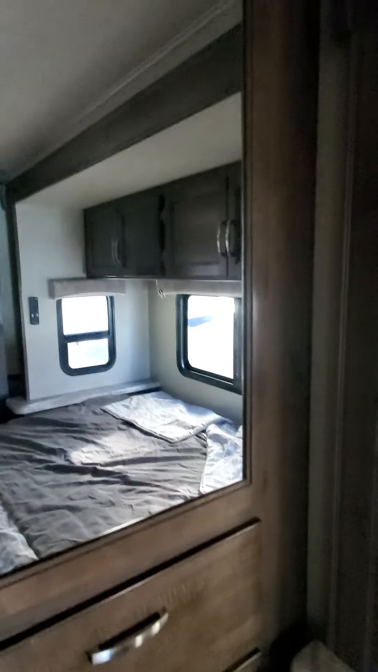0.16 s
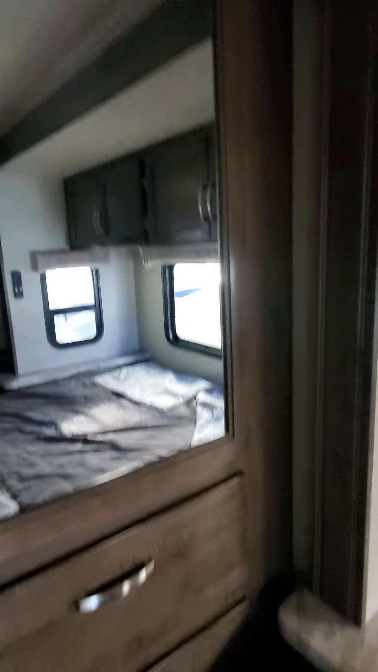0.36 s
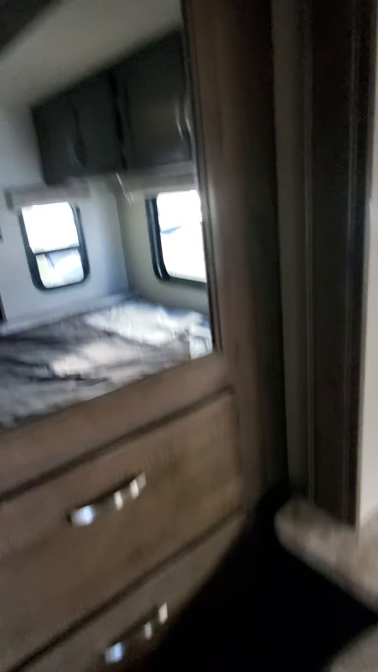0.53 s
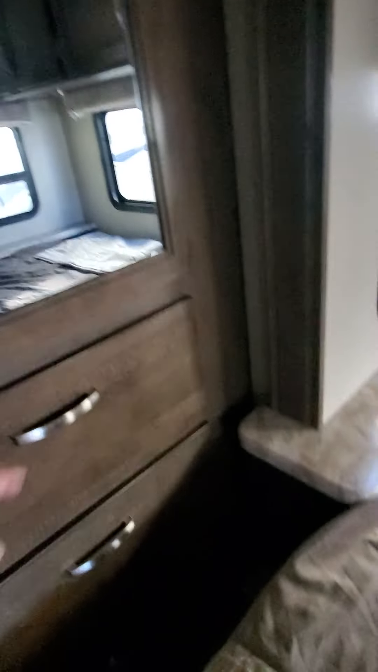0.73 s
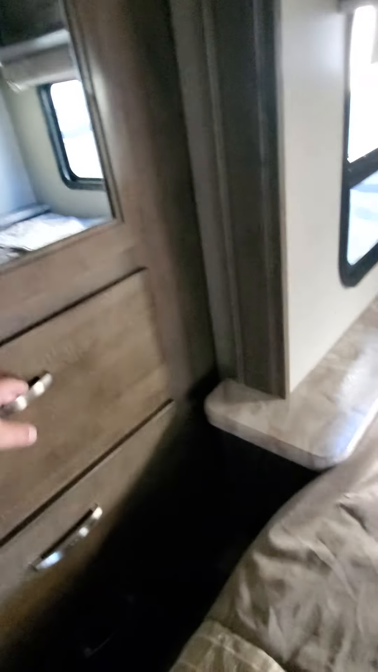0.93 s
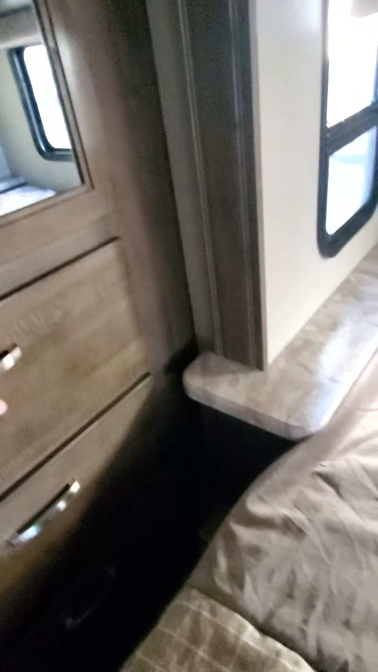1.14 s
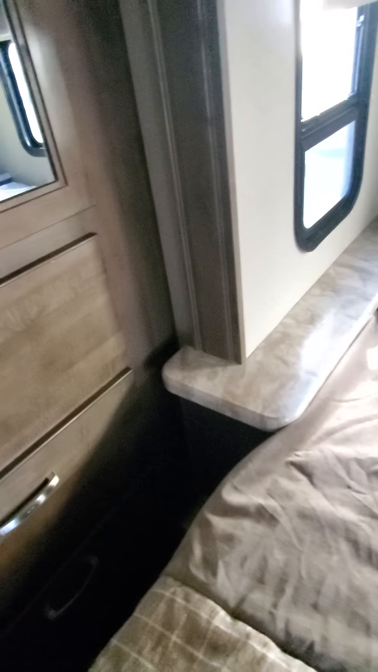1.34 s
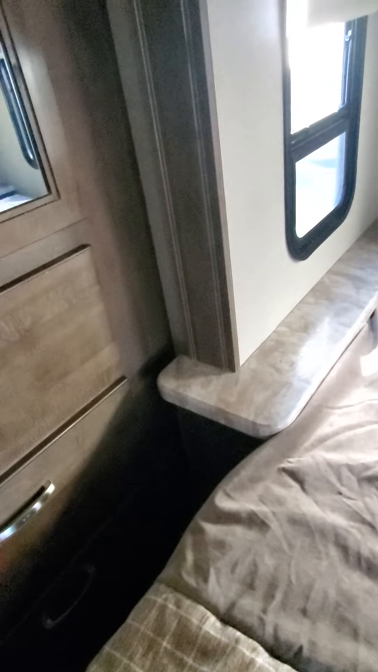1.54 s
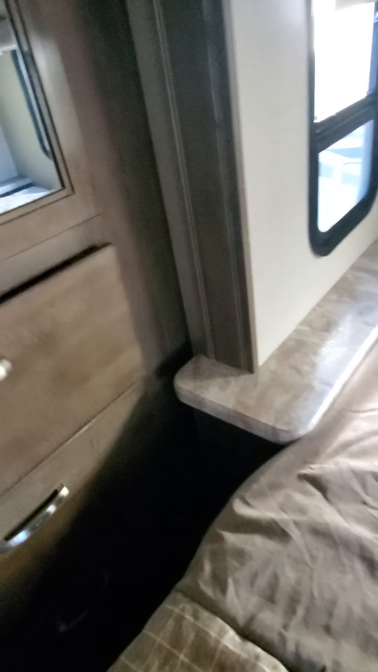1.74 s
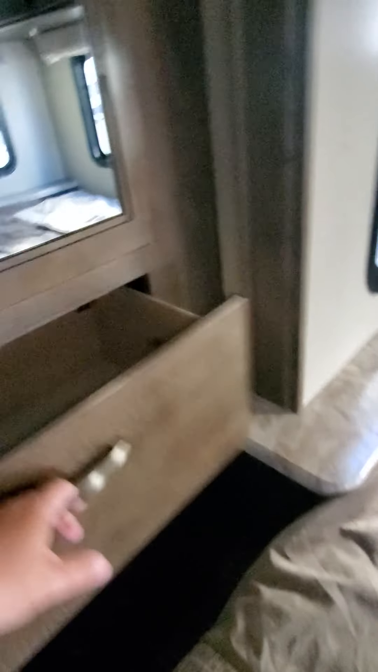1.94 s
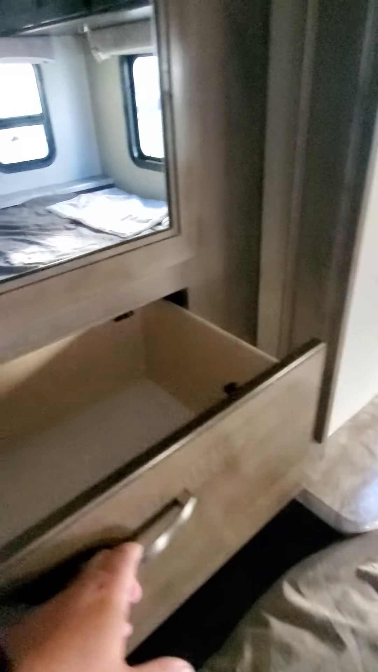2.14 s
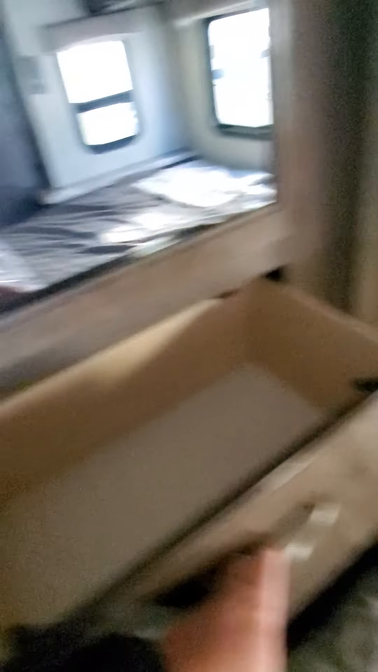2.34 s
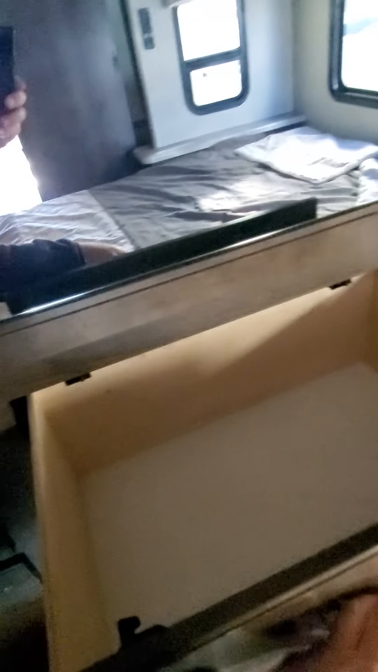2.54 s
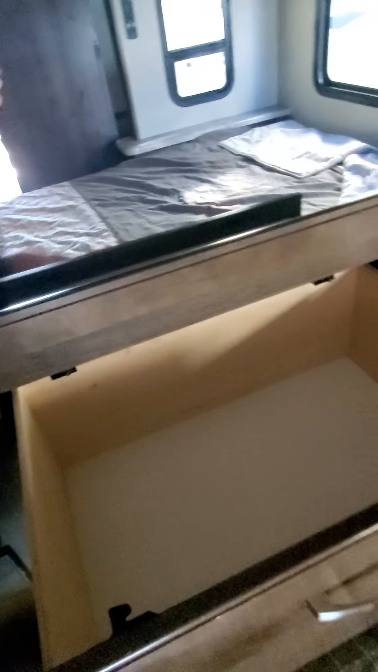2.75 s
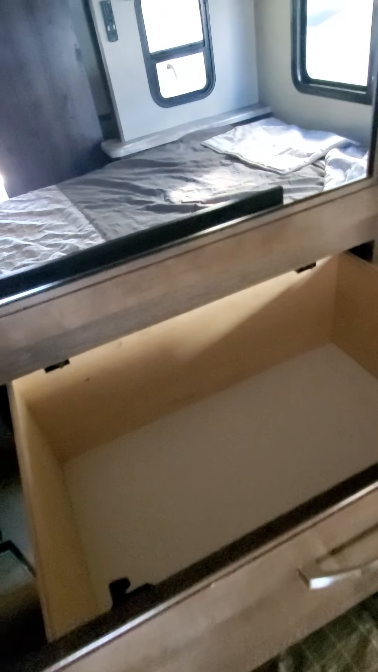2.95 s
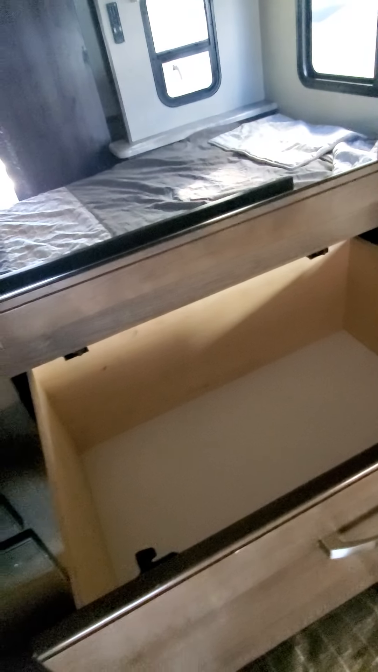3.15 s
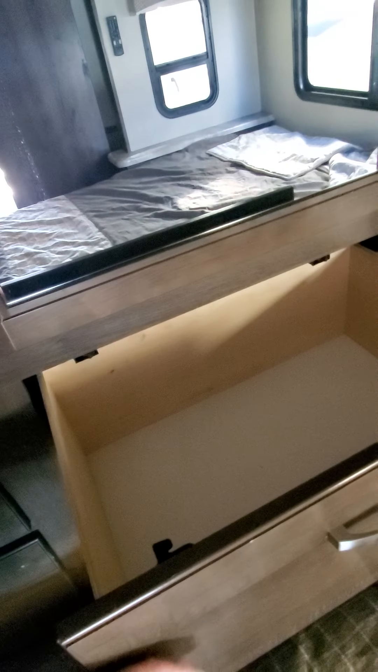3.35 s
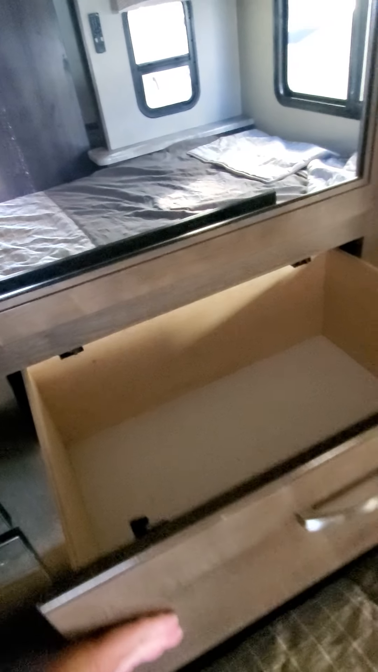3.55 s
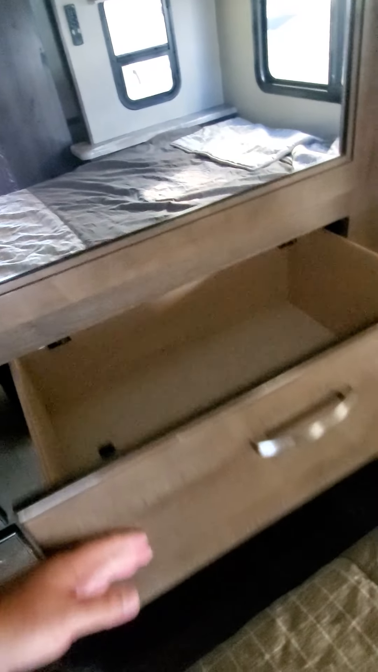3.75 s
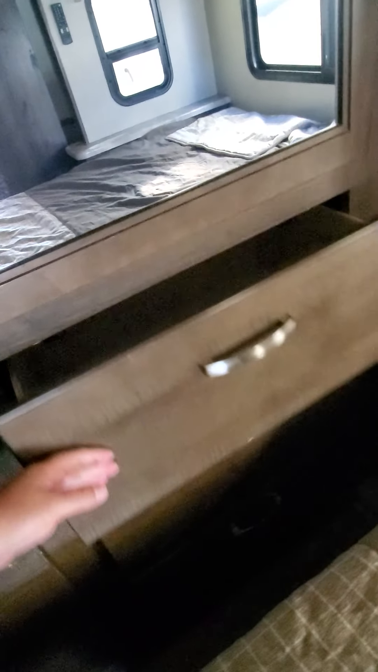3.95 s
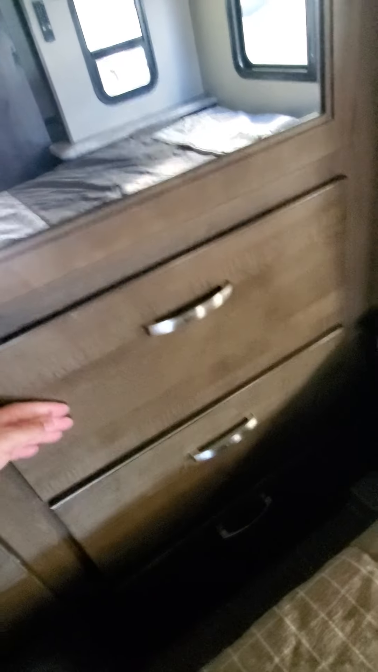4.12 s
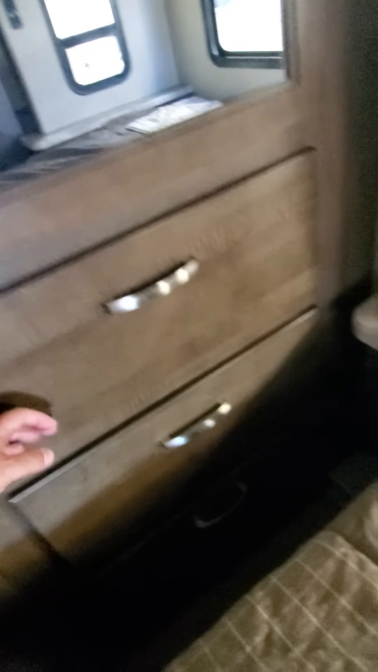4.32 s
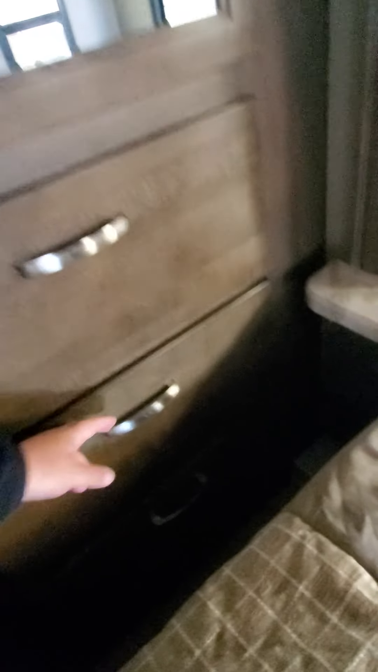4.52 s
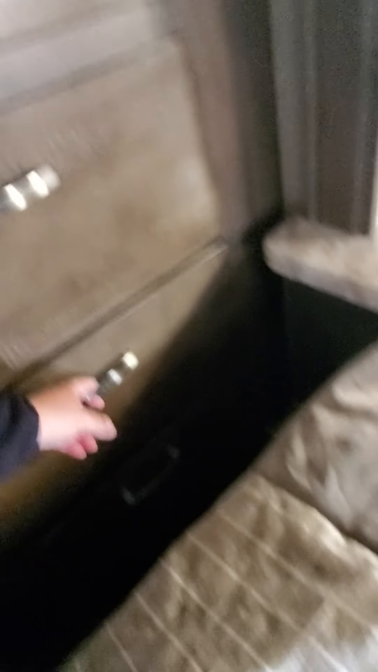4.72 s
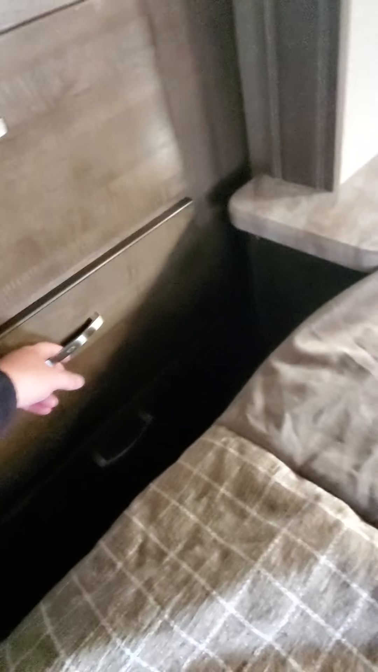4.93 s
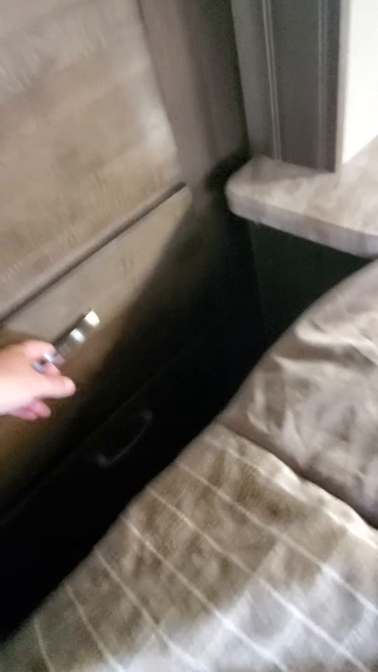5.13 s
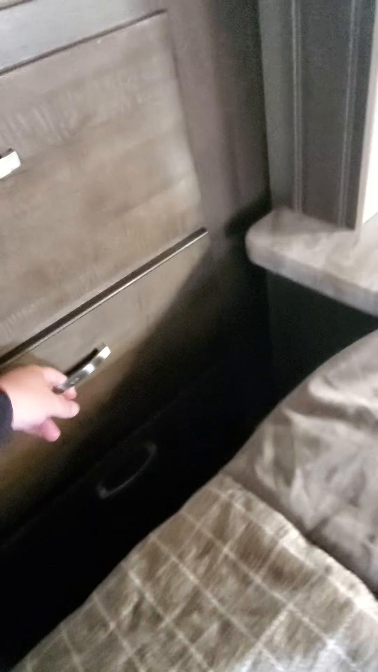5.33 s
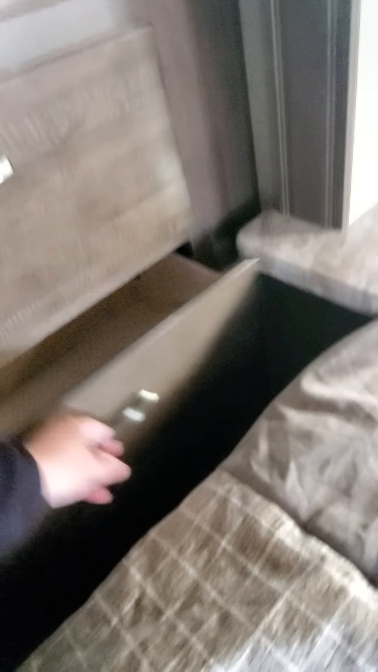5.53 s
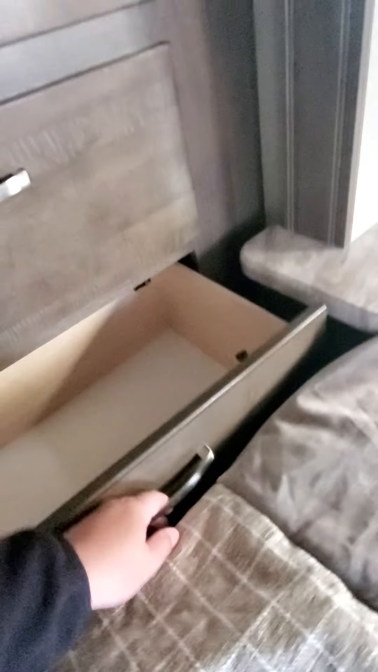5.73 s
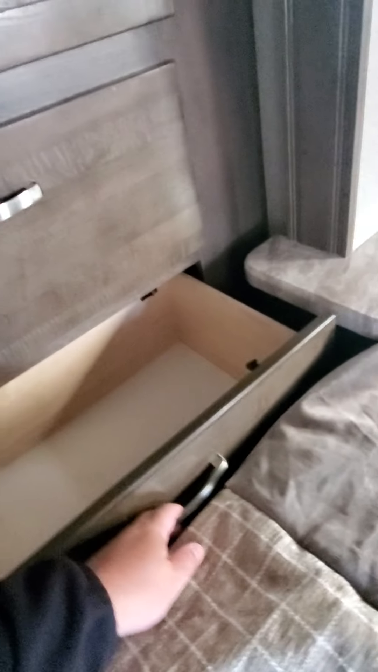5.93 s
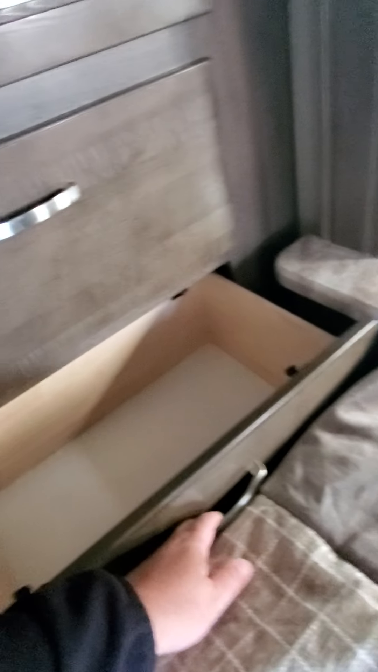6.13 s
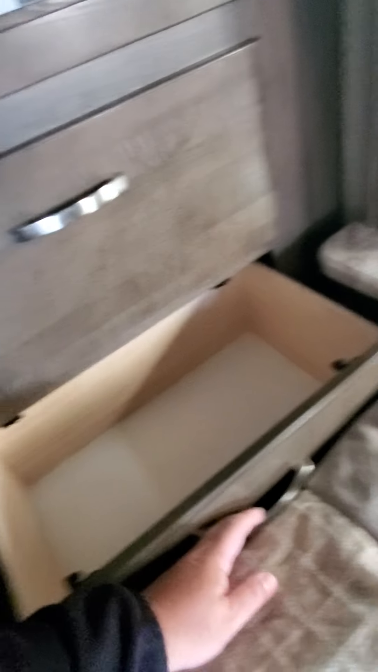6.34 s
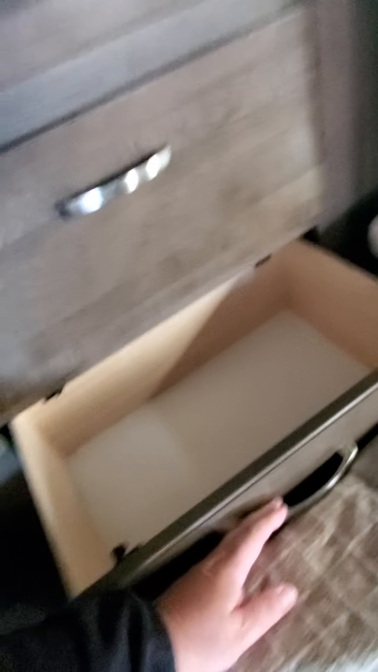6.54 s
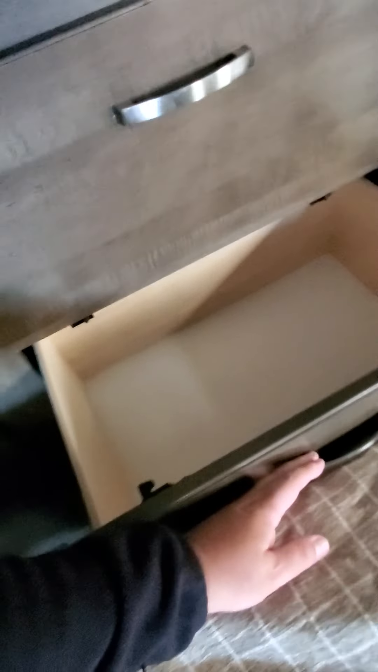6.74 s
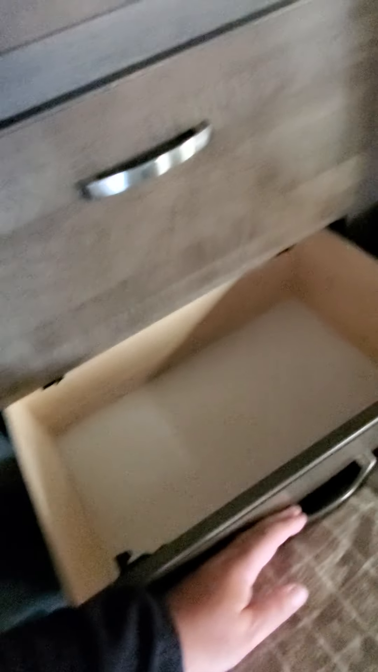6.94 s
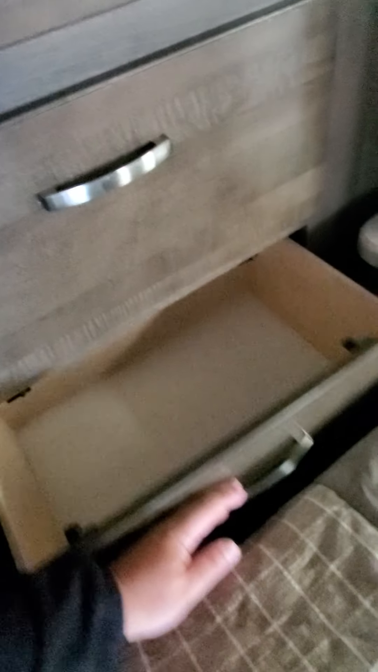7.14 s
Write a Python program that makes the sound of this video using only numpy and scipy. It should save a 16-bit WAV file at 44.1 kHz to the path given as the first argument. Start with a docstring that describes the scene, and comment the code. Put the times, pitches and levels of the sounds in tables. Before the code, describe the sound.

Close hand-held stereo capture of hollow wooden drawers on ball-bearing metal runners. First a heavy door thump, then light latch ticks and handling, a short rumbling slide ending in a loud knock, and faint bedding rustle. Later the drawer is pushed shut with a sharp double bang, and another below is tugged open with softer clatter. Short boxy room echoes, a bassy wall thud, and quiet muffled outdoor rumble beneath.

```python
"""Wooden drawers on metal runners in a small camper bedroom, heard by a hand-held pair of microphone ports.
Over a soft rumble of coloured noise, a door has just shut: blows shake walls, drawer box, runners and latch.
Sleeves and bedding rustle as grainy noise; a hand tugs a latched drawer free and it runs out on ball bearings,
whose bumps ring the same parts and a gliding rail hum. More rustle follows, then the drawer is pushed shut
with a bang and the one below is opened. Blows and slides also echo in the room."""
import sys
import numpy as np
from scipy import signal
from scipy.fft import rfft, irfft, next_fast_len
from scipy.io import wavfile
from scipy.ndimage import uniform_filter1d

SR = 44100
rng = np.random.default_rng(int(sys.argv[2]) if len(sys.argv) > 2 else 0)


def transcribe(signal):
    """Save signal, clipped to [-1, 1], as a 16-bit WAV file at the path in sys.argv[1]."""
    frames = np.atleast_2d(signal).T
    limited = np.clip(frames, -1, 1)
    pcm = np.round(limited * 32767).astype(np.int16)
    wavfile.write(sys.argv[1], SR, pcm)


N = 316549
SIZE = next_fast_len(N + SR)  # samples, with room for the tails
HZ = np.fft.rfftfreq(SIZE, 1 / SR)


def gain_of(db):
    """Turns decibels into amplitude."""
    return 10 ** (np.asarray(db) / 20)


def evened(x):
    """Scales a sound to an average (rms) strength of 1."""
    return x / np.sqrt(np.mean(x ** 2) + 1e-20)


def read(points, hz):
    """Reads a table between its points, on a log-frequency axis."""
    point_hz, value = np.transpose(points)
    return np.interp(np.log(hz + 1), np.log(point_hz + 1), value)


def curve(tables, level_db, fade_s):
    """Draws loudness over time from tables that start with a time column; silent outside them."""
    t = np.arange(N) / SR
    out = np.zeros(N)
    for rows in tables:
        s, *controls = np.transpose(rows)
        to_nearest_end = np.minimum(t - s[0], s[-1] - t)
        fade = np.clip(to_nearest_end / fade_s, 0, 1)
        out += fade * gain_of(np.interp(t, s, level_db(*controls)))
    return out


# How alike the two ports hear a sound: pitch_hz, likeness (0 to 1)
PORT_LIKENESS = [(60, .995), (150, .97), (300, .9), (700, .72), (1500, .55), (3000, .4), (8000, .6)]
# How far the left port leads the right: pitch_hz, lead_radians
PORT_LEAD = [(30, .08), (125, .08), (250, .2), (400, .45), (600, 1.4), (800, 2.2), (1500, 3.5), (2500, 4),
             (5000, 4.4), (10000, 8.7), (16000, 23)]
# How much louder the left port is than the right: pitch_hz, level_db
PORT_TILT = [(60, -1), (1000, 0), (4000, -0.54), (8000, 3), (13000, 5)]


def ports(one, other):
    """Makes left and right spectra from two versions of a sound field: alike in the bass, less so above."""
    likeness = np.clip(read(PORT_LIKENESS, HZ), 0, 1)
    half_lead = np.exp(.5j * read(PORT_LEAD, HZ))
    half_tilt = gain_of(read(PORT_TILT, HZ) / 2)
    left = one * half_lead * half_tilt
    mixed = likeness * one + np.sqrt(1 - likeness ** 2) * other
    right = mixed / half_lead / half_tilt
    return np.array([left, right])


def hiss(spectrum):
    """Noise from all around, coloured by a table of pitch and level."""
    one, other = rfft(rng.standard_normal((2, SIZE))) * gain_of(read(spectrum, HZ))
    return evened(irfft(ports(one, other), SIZE)[:, :N])


# Colour of outdoor rumble and room air: pitch_hz, level_db (per Hz, relative)
AIR_COLOUR = [(15, -46), (25, -10), (70, 0), (134, -19.5), (223, -14), (263, -20.5), (476, -22),
              (516, -23.5), (887, -23), (1130, -25.5), (1700, -33.5), (2220, -34.5), (6380, -49),
              (8360, -57), (16000, -52)]
AIR_DB = -49.5  # level around which the air swells


def air():
    """A lasting background of outdoor rumble and room air, swelling a little at random."""
    swell = uniform_filter1d(rng.standard_normal(N), 6000)
    swell = evened(uniform_filter1d(swell, 6000))
    return gain_of(AIR_DB + 0.47 * swell) * hiss(AIR_COLOUR)


# Ringing tones of each part: pitch_hz, level_db (relative), decay_s (to fall 60 dB, before any shortening)
RUNNER_TONES = [(757, 7.5, 0.025), (844, 0, 0.035), (967, 7.5, 0.02), (1143, -5, 0.13),
                (1270.6, 7.5, 0.017), (1583, -5, 0.051), (1670, 2.5, 0.017), (2025, -6, 0.058),
                (2150, -6, 0.063), (2470, -3.5, 0.022)]
WALL_TONES = [(47.3, -12, .35), (59.4, 0, 0.53), (71, -7.5, 0.36), (79.7, -4, 0.59), (88, 3.5, 0.66),
              (99.4, -8.5, 0.55), (110, 3.5, 0.57), (128, -13.5, 0.31)]
BOX_TONES = [(164, -10, 0.066), (195.5, -5, 0.2), (220, -2, 0.12), (253, -2.5, 0.12), (273.4, -1, 0.055),
             (345, -2.5, 0.21), (409, -8, 0.15), (433, -11, 0.13), (495, -7.5, 0.11), (596, -6.5, 0.012),
             (752, -4.5, 0.093)]
LATCH_TONES = [(2370, 0.5, 0.012), (2816, -3, 0.021), (3230, 2.5, 0.0046), (4060, 0.5, 0.0068),
               (4530, 0.5, 0.0056), (5140, 0.85, 0.0055), (5797, -4.5, 0.013), (6510, -0.36, 0.0059),
               (7310, -3.5, 0.0063)]
TICK_TONES = [(8170, 3, 0.00067), (9570, -0.5, 0.0038), (11500, -4, 0.003), (12600, -3, 0.003),
              (13870, 1.5, 0.0015), (15500, 1, 0.001)]
PARTS = [RUNNER_TONES, WALL_TONES, BOX_TONES, LATCH_TONES, TICK_TONES]


def ring(modes, shorter=1, centre_hz=1000, focus_db=0, scatter=0):
    """A tapped part rings in fading tones, loudest near one pitch; high neighbours start in opposite directions."""
    hz, db, decay_s = np.transpose(modes)[:, :, None]
    t = np.arange(round(1.2 * decay_s.max() * SR)) / SR
    db = db - focus_db * np.log2(hz / centre_hz) ** 2
    hz = hz * (1 + scatter * rng.uniform(-1, 1, hz.shape))
    sign = (-1.) ** (np.arange(len(hz))[:, None] * (hz > 750))
    fading = gain_of(db - 60 * t / (decay_s * shorter))
    return (sign * fading * np.sin(2 * np.pi * hz * t)).sum(0)


# A harder blow wakes the metal and plastic. Each list has one value for runner, latch, tick:
# level_db (against the box, at hardness 0 and a fitting pitch of MIDDLE_HZ)
FITTING_DB = [7.5, 1.5, -5]
# change_db (per dB of hardness)
PER_HARDNESS = [0.85, 1, 1.2]
# change_db (per octave of fitting pitch above MIDDLE_HZ)
PER_OCTAVE_DB = [-14, 0.5, 5]
MIDDLE_HZ = 1200
STILL_MS, STILL_DB = .5, -22  # a shorter rattle than this turns latch and tick down this much


def shares(box_db, wall_vs_box_db, hardness_db, rattle_ms, fitting_hz):
    """Shares one blow among runner, wall, box, latch and tick; hardness and pitch decide how the fittings join."""
    from_hardness = np.array(PER_HARDNESS) * hardness_db
    from_pitch = np.array(PER_OCTAVE_DB) * np.log2(fitting_hz / MIDDLE_HZ)
    runner_db, latch_db, tick_db = box_db + np.array(FITTING_DB) + from_hardness + from_pitch
    still_db = STILL_DB * (rattle_ms < STILL_MS)
    return runner_db, box_db + wall_vs_box_db, box_db, latch_db + still_db, tick_db + still_db


# The blows: start_s, box_db, wall_vs_box_db, hardness_db, rattle_ms,
# box_hz (loudest box pitch), fitting_hz (loudest runner pitch; the latch follows it)
BLOW_LIST = [(0.001, -5.5, -0.5, -8, 0.74, 260, 1004), (0.016, -7.5, 7.5, -22.5, 6.4, 205, 1270),
             (0.049, -13.5, 8, -22, 0.93, 491, 958), (0.082, -42, 31.5, 6.5, 2.5, 253, 940),
             (0.135, -20.5, 0.5, -25, 4.6, 262.5, 1110), (0.186, -54, 23, 1.5, 2.1, 128, 850),
             (0.648, -61, 2, 6, 0.3, 600, 1160), (0.863, -57, 11, 0, 1.54, 330, 1070),
             (1.01, -31.5, -8, -6, 6.4, 225, 1660), (1.462, -31, -3.5, -8, 1.5, 456, 1280),
             (1.494, -38.5, 7, -5, 3.2, 307, 1483), (1.567, -32, -21, -9.5, 2.6, 245, 868),
             (1.633, -42.5, -12, 2, 4.8, 500, 1400), (1.643, -40.5, -9.5, 14, 2.1, 565, 1460),
             (1.746, -38.5, -4, 9.5, 4.6, 346, 1340), (1.751, -33, 6, -4.5, 0.99, 334, 1380),
             (1.756, -44.5, 0, 18.5, 1.2, 345, 1410), (1.849, -28.5, -6, 14.5, 2.55, 557, 980),
             (1.858, -27.5, 3, 3.5, 1.5, 510, 990), (2.04, -25.5, -4, -10, 8.4, 132, 1760),
             (2.0859, 0, -19, -33, 1.1, 262, 1650), (2.868, -53.5, 9.5, 9.5, 0.35, 604, 2220),
             (3.761, -44.5, -19, -4, 19, 340, 1264), (4.09, 1.5, -29, -26, 0.74, 312, 886),
             (4.2, -10.5, 1, -21, 5.7, 312, 1270), (4.221, -9, -3.5, -2.5, 0.85, 516, 2020),
             (4.235, -3.5, 6.5, -19, 1.8, 227, 871), (4.738, -57.5, 24, -31, 2.1, 213, 1277),
             (4.922, -33, -1.5, -24, 2.7, 186.7, 990), (4.94, -29.5, -2, -12.5, 7.2, 465, 1070),
             (4.992, -29.5, -11.5, 2.5, 1.8, 236, 1360), (5.22, -56, 17.5, 1.5, 0.53, 483, 1750),
             (5.285, -18, -11, -22, 1.345, 162, 1035), (5.347, -16.5, -0.5, -43, 2.1, 110, 1570),
             (5.43, -37, 1, -14.5, 0.82, 133, 1380), (5.465, -29, 0, -18, 4.8, 204, 1000),
             (5.529, -21.5, -13.5, -20.5, 10, 392, 1800), (5.55, -13.5, -3, -1, 2.2, 580, 1530),
             (5.598, -21, -27.5, -29.5, 3.3, 172, 1300), (5.628, -17, -23, -41, 1.054, 190, 1195),
             (5.649, -25, -24, -23.5, 1.3, 202, 1235), (5.68, -18, -10.5, -16.5, 0.866, 360, 1200),
             (5.709, -36, 14, 0.5, 3.3, 110, 957), (6.248, -64, 2.5, 4.5, 1.8, 261, 2390)]
# Loudest wall pitch for the door, drawer tugged, drawer at its open stop, drawer shut, lower drawer:
# start_s, pitch_hz
WALL_PITCH = [(0, 89.4), (.5, 75.6), (1.9, 105.7), (3, 67), (4.5, 63.1)]
# The next four lists have one value for runner, wall, box, latch, tick.
# share (0 to 1) of the force that is spread over the rattle
LOOSE_SHARE = [0.85, 0.017, 0.2, 0.98, 0.98]
# shift (fraction of pitch): most a tone moves from blow to blow
BLOW_SCATTER = [.012, .01, .03, .02, .03]
# loss_db (one octave away from the loudest pitch)
BLOW_FOCUS_DB = [24, 26, 38, 4, 0.5]
# press_ms (how long each tap presses, roughly)
PRESS_MS = [.1, 3.9, .9, .02, .02]
LATCH_ABOVE = 3.3  # the latch is loudest at this many times the fitting pitch


def blows():
    """Each blow is a knock drawn out into a rattle by loose fittings; where it lands picks the tones."""
    rattled, knocks = np.zeros(SIZE), np.zeros(SIZE)
    u = np.arange(3000) / SR
    for s, box_db, wall_vs_box_db, hardness_db, rattle_ms, box_hz, fitting_hz in BLOW_LIST:
        levels_db = shares(box_db, wall_vs_box_db, hardness_db, rattle_ms, fitting_hz)
        swell = 1000 * u / max(rattle_ms, .3)
        rattle_shape = swell ** 1.3 * np.exp(-swell)
        wall_hz = [hz for start, hz in WALL_PITCH if start <= s][-1]
        centres_hz = [fitting_hz, wall_hz, box_hz, LATCH_ABOVE * fitting_hz, 10000]
        for part, centre_hz in enumerate(centres_hz):
            press = np.hanning(3 + int(PRESS_MS[part] * SR / 1000))
            tones = ring(PARTS[part], 0.82, centre_hz, BLOW_FOCUS_DB[part], BLOW_SCATTER[part])
            tap = np.convolve(tones, press)
            loose = LOOSE_SHARE[part]
            # cubing the noise makes its hits sparser and spikier
            force = loose * evened(rng.standard_normal(len(u)) ** 3 * rattle_shape)
            force[0] += (1 - loose) * np.sqrt(len(u))
            sound = signal.fftconvolve(force, tap)
            loudest = np.sqrt(uniform_filter1d(2 * sound ** 2, 200).max())
            sound *= gain_of(levels_db[part]) / loudest
            at = max(round(s * SR), 0)
            rattled[at:at + len(sound)] += sound
            # for the echoes: the same energy all at once, inside the rattle
            at += round(loose * rattle_ms * SR / 1000)
            knocks[at:at + len(tap)] += tap * np.linalg.norm(sound) / np.linalg.norm(tap)
    return rattled, knocks


# How fast the room's echoes die: pitch_hz, decay_s (to fall 60 dB)
ROOM_DECAY = [(100, 0.82), (300, 0.15), (1000, 0.18), (3000, 0.21), (7000, 0.13), (11000, 0.18),
              (15000, 0.099)]
# How strong the echoes are against the direct sound: pitch_hz, level_db
ROOM_LEVEL = [(100, -9), (200, -6), (400, 2.5), (1000, 1), (4000, 5), (12000, -5)]


def echoes():
    """Two tails of sparse random echoes, each pitch band dying at its own speed."""
    taps = np.zeros((2, SR // 2))
    # one echo somewhere in every 20 samples
    at = np.arange(60, SR // 2 - 20, 20) + rng.integers(0, 20, (2, (SR // 2 - 61) // 20))
    np.put_along_axis(taps, at, rng.choice([-1., 1.], at.shape), 1)
    hz, t, bands = signal.stft(taps, SR, nperseg=256)
    decay_s = read(ROOM_DECAY, hz)[:, None]
    level_db = read(ROOM_LEVEL, hz)[:, None]
    total = np.sqrt(decay_s * SR / 20 / np.log(1e6))  # a long tail is not made louder overall
    fading = gain_of(level_db - 60 * t / decay_s) / total
    tail = signal.istft(bands * fading, SR, nperseg=256)[1]
    tail[:, :60] = 0
    return rfft(tail, SIZE)


def bedroom(direct, knocks):
    """Direct sound plus echoes; three random echo patterns take turns steadily, so no single one colours the room."""
    t = np.arange(SIZE) / SR
    heard = rfft(direct) * ports(1, -1j)
    for k in range(3):
        share = np.sqrt(2 / 3) * np.cos(2 * np.pi * (1.6 * t + k / 3))
        heard += rfft(knocks * share) * ports(*echoes())
    return irfft(heard, SIZE)[:, :N]


# Sleeve and bedding rustle, one list a stretch: start_s, level_db (before grain and fades)
RUSTLE_LEVEL = [
    [(0.45, -99), (0.886, -68), (1.4, -86)],
    [(2.15, -37), (2.242, -62), (2.6, -61.5)],
]
# Colour of the cloth: pitch_hz, level_db (per Hz, relative)
CLOTH_COLOUR = [(600, -22), (1500, -8), (3000, 0), (6000, -2), (8000, -13), (15000, -17)]


def rustle():
    """Cloth drags over cloth: coloured noise in small uneven grains."""
    grain = evened(uniform_filter1d(rng.standard_normal(N), 300))
    return curve(RUSTLE_LEVEL, np.asarray, .2) * gain_of(1.2 * grain) * hiss(CLOTH_COLOUR)


# Drawer travel, one list a stretch: start_s, roll_db (strength of rolling),
# drag_db (more drag favours wall over runner), hum_hz (pitch of the rail), hum_db
TRAVEL = [
    [(1.88, -31, -11, 980, -23), (1.93, -35.5, -20, 993, -28.5), (1.98, -35, -16.5, 913, -33.5),
     (2.078, -39.5, 14.5, 859, -31.5)],
    [(3.55, -77.5, -3, 1312, -77.5), (3.744, -55.5, -2, 1500, -71), (3.79, -45, 4.5, 1473, -65),
     (3.9, -46.5, -17.5, 1621, -53.5), (3.94, -42, -6, 1328, -44), (3.96, -45.5, -14.5, 622, -51),
     (4.08, -39.5, 2, 581, -39)],
    [(5.3, -39, 12, 823, -55.5), (5.374, -53, 15.5, 806, -60.5), (5.52, -58.5, 5, 784.6, -62)],
    [(5.58, -29.5, 2, 797.5, -35), (5.68, -30.5, 4, 900, -30.5), (5.748, -38.5, 10.5, 1006, -65),
     (5.86, -88.5, 12, 987, -91.5)],
    [(7.05, -106.5, 9, 994, -100), (7.178, -53, 16, 1000, -73)],
]
HUM_WIDTH_HZ = 32  # a wider hum is rougher


def rail_hum(force):
    """The free length of rail changes as the drawer travels, so its hum glides; the bumps keep it going."""
    s, hz = np.transpose([(row[0], row[3]) for rows in TRAVEL for row in rows])
    glide_hz = np.interp(np.arange(N) / SR, s, hz)
    turn = np.exp(2j * np.pi * np.cumsum(glide_hz) / SR)
    r = np.exp(-np.pi * HUM_WIDTH_HZ / SR)
    # shift the gliding pitch down to zero, smooth there, shift back up
    smooth = signal.lfilter([1 - r], [1, -r], force / turn)
    hum = evened((turn * smooth).real)
    return hum * curve(TRAVEL, lambda roll_db, drag_db, hum_hz, hum_db: hum_db, 0.0062)


# The next six lists have one value for runner, wall, box, latch, tick.
# level_db (against USUAL_ROLL_DB, when rolling at that strength without drag)
ROLL_LEVEL_DB = [-0.5, -3, 2.5, -24, -38]
# change_db (per dB of rolling)
PER_ROLL_DB = [0.76, 0.67, 0.92, 1, 1.5]
# change_db (per dB of drag)
PER_DRAG_DB = [-0.22, 1, 0.4, 0.52, -.3]
# factor on the decay time while the drawer rubs (no unit)
RUBBED_DECAY = [0.31, 0.093, 0.09, 0.28, 1]
# pitch_hz (loudest pitch while rolling)
ROLL_PITCH_HZ = [1100, 69.1, 330, 3300, 9000]
# loss_db (one octave away from that pitch)
ROLL_LOSS_DB = [6.3, 2.3, 0.51, 2.3, 2.3]
USUAL_ROLL_DB = -35
BALLS_PER_S = 2600  # average bumps a second
SHIFTING, SPOTS_PER_S = .08, 22  # contact wanders: largest shift (fraction of pitch), changes a second
JUDDER_DB, LUMP_DB = 1.5, 2  # uneven spurts; spread of bump sizes


def slides():
    """Ball bearings bump along the runners in uneven spurts and shake every part, whose ringing rubbing changes."""
    out = np.zeros(SIZE)
    judder = gain_of(JUDDER_DB * evened(uniform_filter1d(rng.standard_normal(N), 500)))
    spot = (np.arange(N) * SPOTS_PER_S // SR).astype(int) % 5  # five contact spots take turns
    sizes = gain_of(LUMP_DB * np.minimum(rng.exponential(1, N), 4))
    bumps = sizes * (rng.random(N) < BALLS_PER_S / SR) * judder
    for part, modes in enumerate(PARTS):
        def part_db(roll_db, drag_db, *hum):
            """Level of this part: rolling and drag each raise or lower it."""
            usual_db = USUAL_ROLL_DB + ROLL_LEVEL_DB[part]
            return usual_db + PER_ROLL_DB[part] * (roll_db - USUAL_ROLL_DB) + PER_DRAG_DB[part] * drag_db

        force = curve(TRAVEL, part_db, 0.003) * evened(bumps * rng.standard_normal(N))
        for k in range(5):
            tap = ring(modes, RUBBED_DECAY[part], ROLL_PITCH_HZ[part], ROLL_LOSS_DB[part], SHIFTING)
            tap = tap / np.linalg.norm(tap)
            out[:N] += signal.oaconvolve(force * (spot == k), tap)[:N]
    out[:N] += rail_hum(bumps * rng.standard_normal(N))
    return out


def dresser():
    """Blows and slides shake the furniture, heard directly and through the bedroom's echoes."""
    rattled, knocks = blows()
    rolling = slides()
    return bedroom(rattled + rolling, knocks + rolling)


def scene():
    """All sources at the two ports."""
    return air() + dresser() + rustle()


EDGE_HZ = 16500  # pitch above which everything is filtered away


def record(dry):
    """The microphone drops the deepest bass, loud peaks round off softly; then a steep filter removes the top."""
    thin = signal.sosfilt(signal.butter(3, 42, "high", fs=SR, output="sos"), dry)
    held = 1.016 * np.tanh(thin / 1.1)
    steep = signal.firwin(255, EDGE_HZ, window=("kaiser", 9), fs=SR)
    held = signal.oaconvolve(held, steep[None], "same")
    return np.clip(held, -1, 1)


dry = scene()
out = record(dry)
transcribe(out)
```